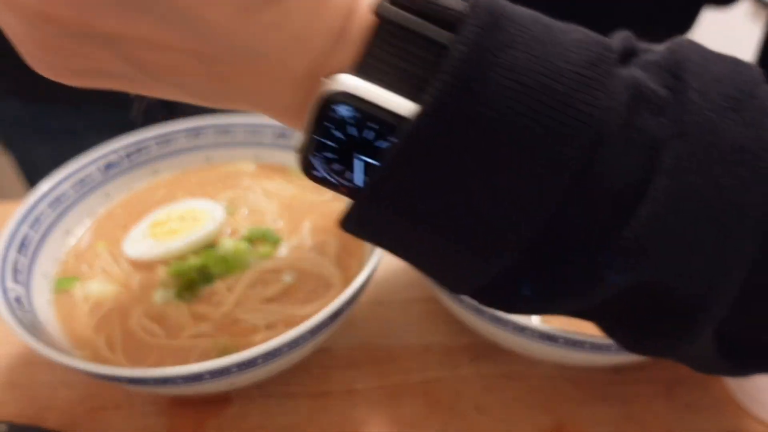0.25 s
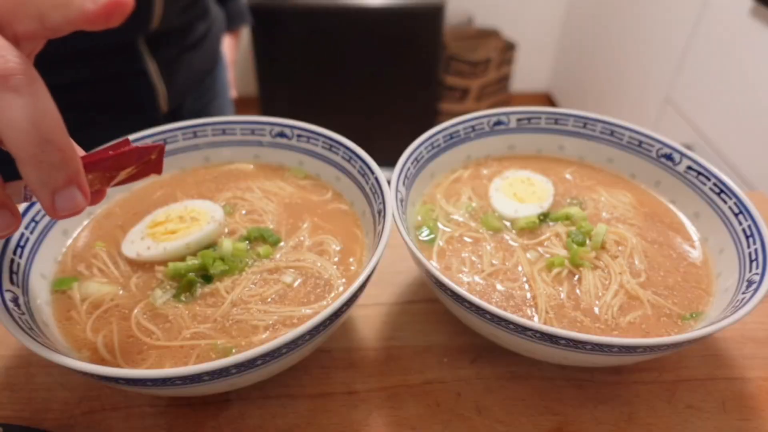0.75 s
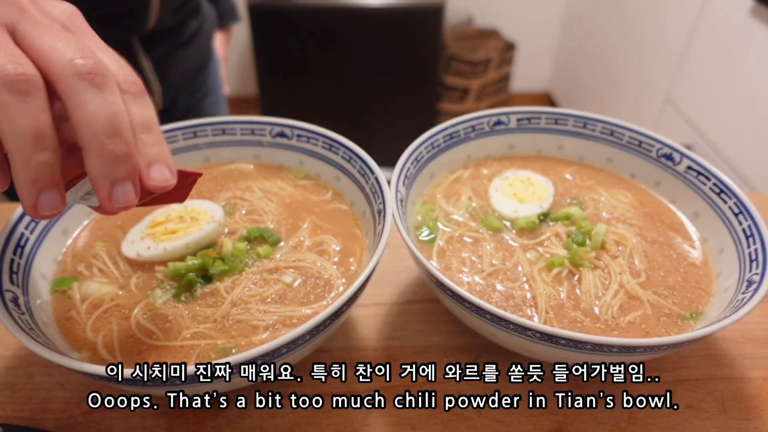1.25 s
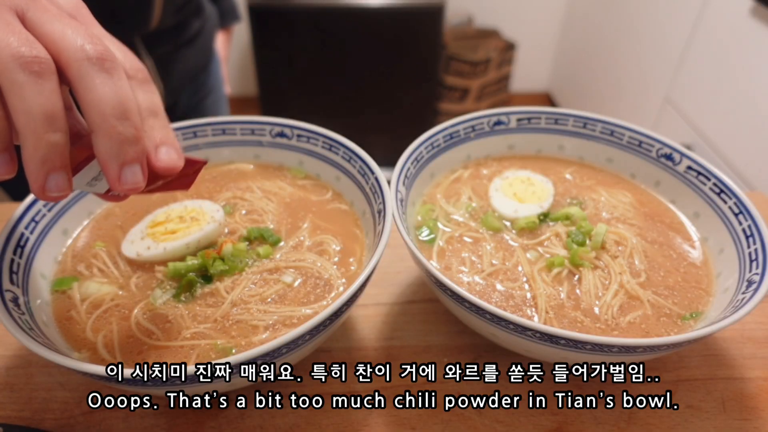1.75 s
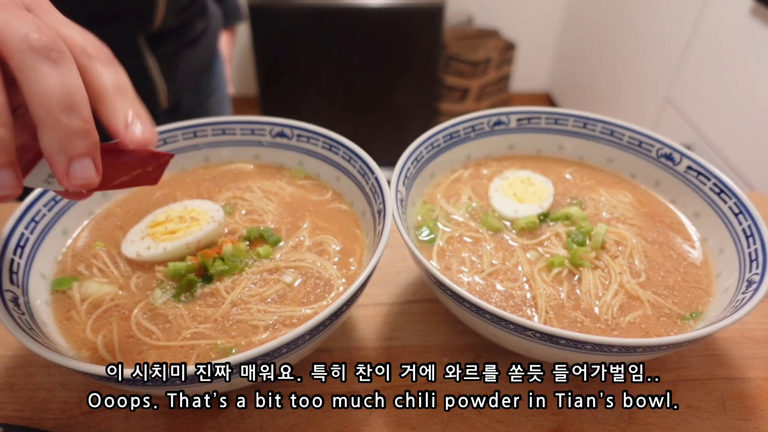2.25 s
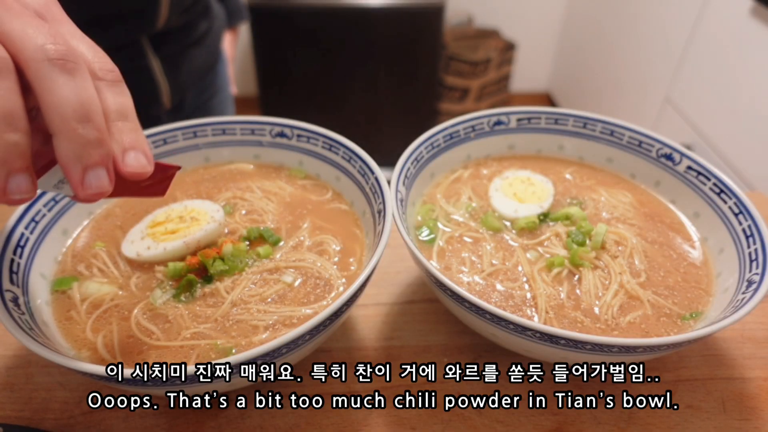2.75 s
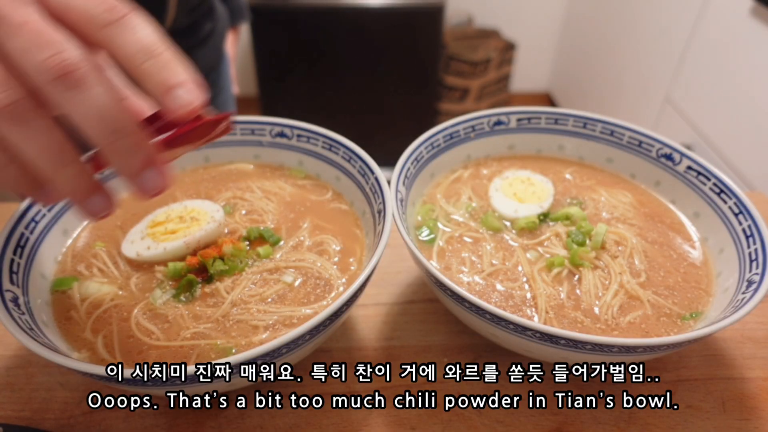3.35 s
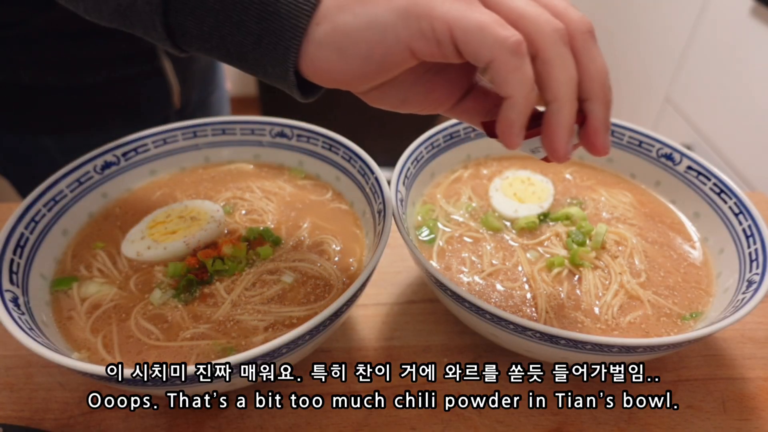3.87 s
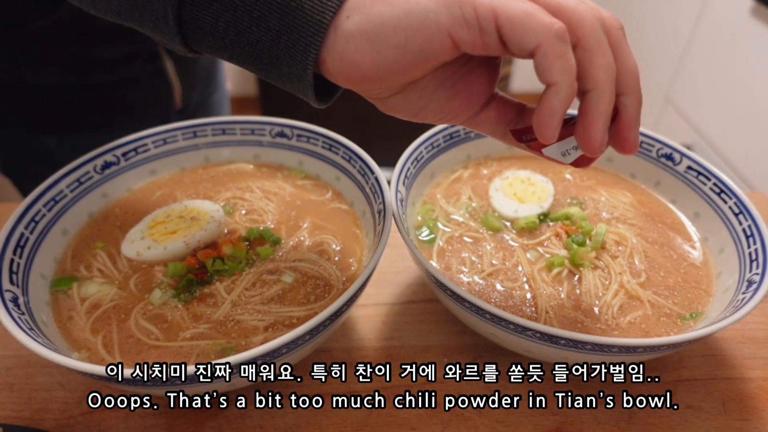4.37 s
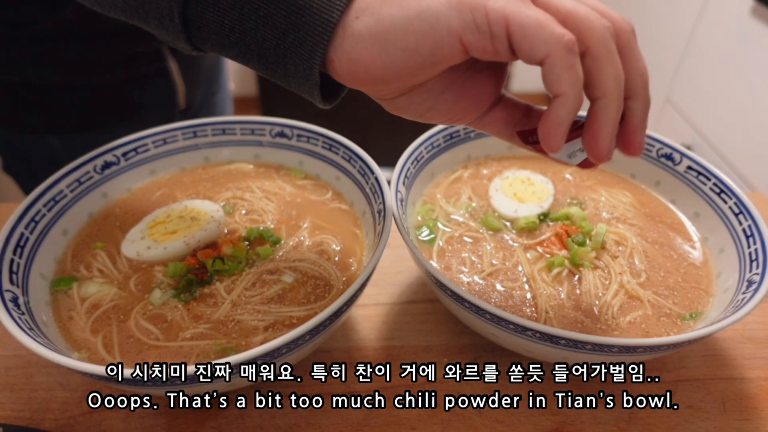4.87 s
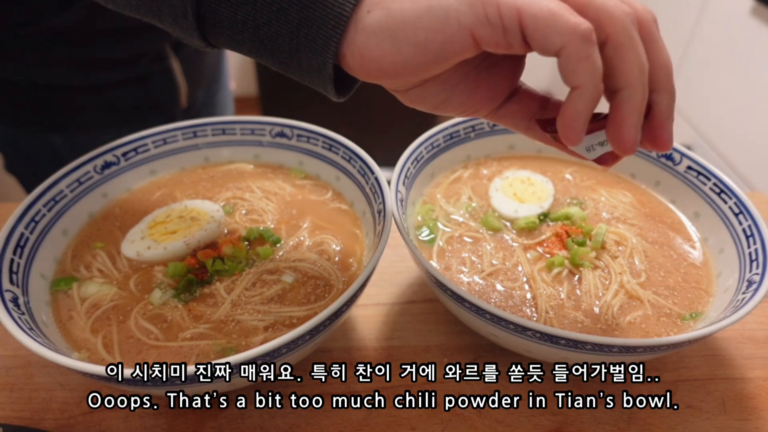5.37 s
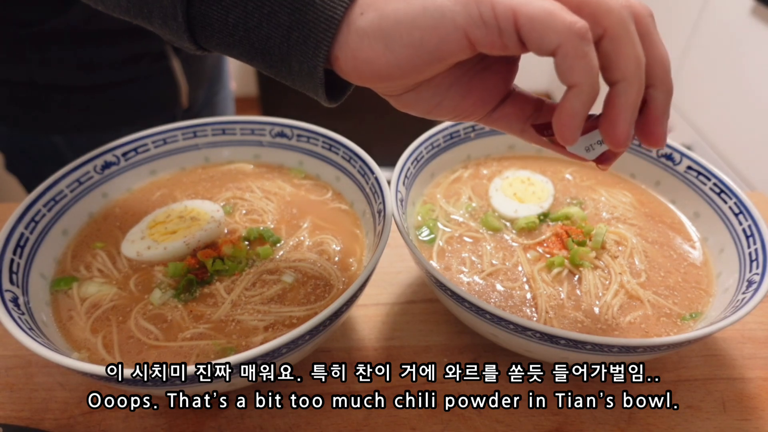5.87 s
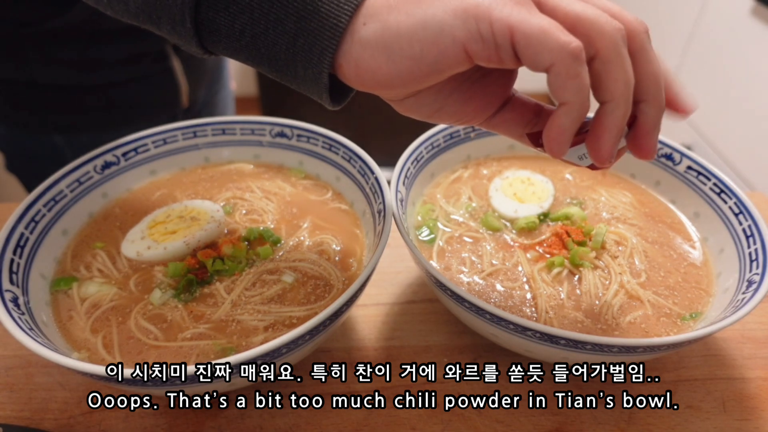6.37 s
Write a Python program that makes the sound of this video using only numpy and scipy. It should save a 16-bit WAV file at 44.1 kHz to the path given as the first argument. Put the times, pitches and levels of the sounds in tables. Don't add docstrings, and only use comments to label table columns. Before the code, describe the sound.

Close microphone in a small hard-walled kitchen with faint hum and hiss. Hands busily crumple a foil sachet for just over half a second, then an abrupt cut to quieter, separated finger taps whose dented foil pops in and out. Dull thuds and a loud bright clatter follow from across the room, then light crinkles, and finally a cluster of clatters with a firm squeeze before another cut.

```python
import sys
import numpy as np
from scipy import signal
from scipy.fft import rfft, irfft
from scipy.io import wavfile

SR = 44100
rng = np.random.default_rng(int(sys.argv[2]) if len(sys.argv) > 2 else 0)


def to_wav(sig):
    pcm = np.clip(np.atleast_2d(sig), -1, 1) * 32767
    pcm = np.round(pcm).astype(np.int16)
    wavfile.write(sys.argv[1], SR, pcm.T)


def natural_amplitude(level_db):
    exponent = np.asarray(level_db, float) / 20
    return 10 ** exponent


N = 291942

CUTS_S = [0, .6256, 6.548, 7]
# f/Hz, level/dB
FIZZ_SPECTRUM = [(2000, -45), (3800, -6.5), (4890, -3.5), (5880, 3), (7400, 0.5), (8700, -4), (9730, -9),
                 (15200, -18), (16100, -23), (16500, -51)]
DENT_HZ = 2400


def unit(x):
    return x / np.sqrt(np.mean(x ** 2) + 1e-20)


def peak_one(x):
    return x / np.abs(x).max()


def coloured(x, spectrum):
    hz, level_db = np.transpose(spectrum)
    grid_hz = np.maximum(np.arange(2049) * SR / 4096, 1)
    log_gain = np.interp(np.log(grid_hz), np.log(hz), level_db) * np.log(10) / 20
    cepstrum = irfft(log_gain)
    cepstrum[1:2048] *= 2
    cepstrum[2049:] = 0
    response = irfft(np.exp(rfft(cepstrum)))
    return signal.fftconvolve(x, response)[:len(x)]


def band(x, low_hz, high_hz):
    return signal.sosfilt(signal.butter(2, [low_hz, high_hz], "band", fs=SR, output="sos"), x)


def resonance(x, hz, width_hz):
    r = np.exp(-np.pi * width_hz / SR)
    zeros = [(1 - r * r) / 2, 0, (r * r - 1) / 2]
    poles = [1, -2 * r * np.cos(2 * np.pi * hz / SR), r * r]
    return signal.lfilter(zeros, poles, x)


def add(track, piece, s):
    at = round(s * SR)
    track[at:at + len(piece)] += piece[:N - at]


def grains(per_s, spread_db, wash):
    clump = unit(band(rng.standard_normal(N), 9.3, 60))
    born = rng.random(N) < per_s * natural_amplitude(5 * clump) / SR
    sizes = natural_amplitude(spread_db * np.minimum(rng.exponential(1, N), 3))
    fade = np.exp(-1 / (0.0007 * SR))
    envelope = signal.lfilter([1], [1, -fade], born * sizes + 1e-18)
    bursts = envelope * rng.standard_normal(N)
    return unit(unit(bursts) + wash * rng.standard_normal(N))


def background():
    # f/Hz, level/dB
    hum_spectrum = [(12, -40), (20, 3), (102, -1.5), (174, 1), (281, -2.5), (452, -24.5), (583, 0),
                    (939, 1.5), (1390, -6.5), (2310, -2.5), (3140, -9.5), (7100, -14.5), (9950, -18.5),
                    (15200, -20.5), (16500, -19)]
    # f/Hz, width/Hz, level/dB
    whine_tones = [(450, 160, -68.5), (2260, 69, -72.5)]
    noise = rng.standard_normal((2, N))
    whines = np.zeros(N)
    for hz, width_hz, level_db in whine_tones:
        tone = resonance(resonance(noise[1], hz, width_hz), hz, width_hz)
        whines += natural_amplitude(level_db) * unit(tone)
    return natural_amplitude(-57) * unit(coloured(noise[0], hum_spectrum)) + whines


def handling():
    # t/s, level/dB
    kneading_effort = [(0, -31), (.06, -35.5), (.09, -46), (.1, -33.5), (.116, -39), (.125, -34), (.2, -37),
                       (.214, -40), (.26, -42), (.29, -39), (.322, -43), (.33, -33.5), (.41, -39),
                       (.47, -36.5), (.515, -44), (.525, -37), (.626, -34.5)]
    # t/s, level/dB
    holding_effort = [(0.63, -58), (1.69, -56.5), (2.32, -50.5), (2.57, -58), (3.23, -58.5), (3.63, -56.5),
                      (3.82, -48), (4.0, -54), (4.23, -56.5), (4.5, -57.5), (4.76, -51.5), (5.29, -57),
                      (5.44, -48.5), (5.45, -84), (6.02, -41), (6.15, -28), (6.25, -34.5), (6.472, -65),
                      (6.62, -58.5)]
    # f/Hz, level/dB
    rub_spectrum = [(30, -25), (100, -26), (200, -10.5), (300, 1.5), (450, 1), (800, -4.5), (1300, -7.5),
                    (1900, -12.5)]
    # f/Hz, level/dB
    crackle_spectrum = [(470, -21), (800, 0.5), (1420, 4), (1750, 4.5), (2010, 3), (3050, 1), (4320, -3.5),
                        (5500, -9), (7150, -84), (12100, -120)]
    t = np.arange(N) / SR
    knead_db = np.interp(t, *np.transpose(kneading_effort))
    hold_db = np.interp(t, *np.transpose(holding_effort))
    kneading = t < CUTS_S[1]
    crackle_db = np.where(kneading, knead_db, hold_db)
    rub_db = np.where(kneading, knead_db - 1, -38 + 0.42 * hold_db)
    fizz_db = crackle_db + np.where(kneading, 0, -4)

    creases = grains(500, spread_db=1.5, wash=1.0)
    skin = grains(450, spread_db=1.0, wash=0.56)
    rub = unit(band(coloured(skin, rub_spectrum), 58, 2300))
    crackle = unit(coloured(creases, crackle_spectrum))
    finest = creases + 0.096 * grains(1000, spread_db=1, wash=0.82)
    fizz = unit(coloured(finest, FIZZ_SPECTRUM))
    sleeve = natural_amplitude(-16.5) * unit(band(rng.standard_normal(N), 35, 174))
    sheet = natural_amplitude(-5.5) * unit(resonance(creases, hz=2030, width_hz=37))
    out = kneading * natural_amplitude(knead_db) * (sleeve + sheet)
    out += natural_amplitude(rub_db - 1.5) * rub
    out += natural_amplitude(crackle_db - 1.5) * crackle
    out -= natural_amplitude(fizz_db - 1.5) * fizz
    return out


def bumps():
    # t/s, peak level/dB, f/Hz
    contacts = [(0.001, -24, 404), (0.031, -26, 450), (0.328, -25, 504), (0.346, -21, 400),
                (0.531, -22, 497), (3.558, -39, 199), (3.672, -28, 125), (3.677, -20.5, 220),
                (5.467, -28, 241), (5.513, -30, 300), (6.2807, -17.5, 276), (6.294, -23, 300)]
    cycles = 2.24
    out, t = np.zeros(N), np.arange(4000) / SR
    for s, peak_db, hz in contacts:
        swing = natural_amplitude(peak_db - 20 * t * hz / cycles) * np.sin(2 * np.pi * hz * t)
        add(out, band(swing, 0.7 * hz, 9000), s)
    return out


def snap_rows():
    # t/s, peak level/dB, own ring f/Hz, bright level/dB
    crumple = [(0.013, -17, 2100, -3), (0.0245, -17, 2030, 18), (0.033, -18, 8900, -14),
               (0.0407, -16, 3650, 9), (0.0507, -8, 2060, -3), (0.0963, -13, 2260, 9),
               (0.1232, -16, 7300, 8), (0.1995, -13.5, 2010, 4), (0.2222, -22, 1420, 2),
               (0.2682, -14, 2930, 15), (0.2892, -13, 3000, 7), (0.3283, -12.5, 1470, 5),
               (0.3354, -10.5, 3590, 2), (0.1085, -18, 7300, 6), (0.179, -23, 4300, 0),
               (0.36, -17, 2000, 4), (0.3919, -14, 7440, 12), (0.473, -13, 7300, -7),
               (0.4133, -18, 5800, 9), (0.4231, -8.5, 2030, 25), (0.4627, -7.5, 2060, 10),
               (0.5212, -4, 2000, 0), (0.5596, -14, 2240, 12), (0.5683, -12, 7550, 0),
               (0.5976, -14.5, 2160, 18)]
    # t/s, peak level/dB, own ring f/Hz, bright level/dB
    crinkle = [(0.0015, -21, 1180, 8), (0.0615, -16, 1690, 7), (0.1005, -16, 2290, 5),
               (0.128, -16, 6500, 1), (0.1345, -17, 2100, 9), (0.1765, -26, 1410, 0),
               (0.1968, -16, 7150, 8), (0.2075, -31, 6500, 5), (0.2385, -30, 1500, 0),
               (0.2535, -22, 1600, 5), (0.2805, -31, 7500, 7), (0.299, -24, 2400, -2),
               (0.311, -31, 2000, -8), (0.3495, -13.5, 2590, 13), (0.399, -17, 7200, 6),
               (0.451, -21, 5800, 6), (0.5372, -15, 2140, -4), (0.5775, -22, 4500, 6), (0.62, -22, 7050, 5),
               (0.9295, -24, 2300, -6), (0.9525, -30, 1800, 5), (0.9785, -28, 5500, 7),
               (1.0165, -34.5, 1290, -5), (1.6175, -27, 1770, -14), (2.874, -41, 1760, -7),
               (2.8995, -25, 2100, -12), (2.911, -31, 2200, -4), (3.2815, -36, 1800, -12),
               (3.308, -33, 2500, -5), (3.387, -33, 1850, -12), (3.411, -45, 1750, -6),
               (3.5755, -41, 990, 0), (4.7665, -42, 3500, 0)]
    # t/s, peak level/dB, own ring f/Hz, bright level/dB
    further_creases = [(0.1255, -19, 2500, 0), (0.3292, -19, 1900, -3), (0.4665, -15, 2100, -5),
                       (0.534, -15, 1500, 2), (0.933, -27, 7500, 8), (1.343, -34, 1200, -10),
                       (1.3515, -32, 3200, 5), (1.781, -38, 2400, 3), (1.812, -35, 3300, 5),
                       (2.426, -36, 1700, -8), (2.8415, -36, 8500, 8), (3.6735, -12, 5200, 0),
                       (3.679, -8, 6000, -3), (3.8432, -16.5, 3000, 5), (5.065, -39.5, 3500, 3),
                       (5.194, -38, 2500, 5), (5.408, -28, 2000, 0), (5.838, -30, 3000, 5),
                       (6.088, -24, 3800, -5), (6.1155, -12, 3000, 3), (6.287, -13, 2880, -2),
                       (5.5305, -19, 4030, -8), (3.8515, -21, 6900, 8), (6.032, -20, 5700, 3),
                       (6.16, -20, 2200, -5), (4.5455, -29, 3000, 3), (4.7025, -30, 3200, 3),
                       (4.455, -38, 3200, 4), (4.611, -26, 5500, 4)]
    # t/s, peak level/dB, own ring f/Hz, bright level/dB
    buckle = [(0.1476, -14.5, 2240, 12), (0.3451, -14, 2630, 24), (0.3763, -11, 1950, 6),
              (0.4399, -13, 2000, 10), (0.5317, -12, 2030, 6), (0.6127, -17, 7100, 5),
              (2.889, -22.5, 1210, -7), (3.316, -34, 2030, -14), (3.3979, -27, 1750, -16),
              (3.6713, -6, 5050, -12), (3.6771, -1.5, 3780, -7), (3.8224, -27, 1900, -21),
              (5.5204, -21, 2530, -5), (6.1082, -12.5, 1380, -4), (6.2645, -22, 2300, -3),
              (6.2815, -9, 2750, 2)]
    # t/s, peak level/dB, own ring f/Hz, bright level/dB
    pinch = [(0.6924, -33, 2840, 29), (0.9214, -9, 6800, 3), (1.4728, -34, 2130, 15),
             (1.762, -28, 2300, -15), (1.8936, -32.5, 7200, -3), (2.9206, -24, 2070, 16),
             (3.05, -34, 7100, 3), (3.089, -31.5, 8300, -5), (3.2669, -21, 2490, -11),
             (3.356, -27, 2410, -3), (3.3764, -22.5, 1870, -16), (3.6575, -32, 2560, -7),
             (3.831, -27, 4000, -16), (3.84, -20, 7000, 5), (3.8468, -15, 2250, -4),
             (3.851, -5.5, 2260, -9.5)]
    # t/s, peak level/dB, own ring f/Hz, bright level/dB
    hidden = [(0.9143, -16.5, 2300, 2), (0.965, -20, 3560, 11), (1.0065, -29.5, 4480, -2),
              (1.995, -36, 7350, -4), (2.1275, -45, 7550, 3), (2.19, -36, 6950, -8),
              (2.5279, -25.5, 6960, -4), (3.528, -35, 5900, -4), (3.56, -37, 3000, 2),
              (3.869, -38, 6840, -7), (3.8795, -21, 6940, -11), (3.932, -27.5, 2540, -3),
              (3.9545, -29, 6470, -10), (4.3965, -25.5, 2320, 1), (4.455, -39, 2520, -3),
              (4.5375, -24, 2980, 5), (4.9136, -35.5, 3320, 11), (4.9874, -31, 2940, 2),
              (5.047, -33.5, 5550, -16), (5.128, -37, 2730, -1), (5.2321, -35, 4160, -20),
              (5.2384, -23, 3770, -31), (5.3835, -29.5, 2690, -4), (5.7054, -25.5, 5450, 12),
              (5.899, -22.5, 3060, -2), (6.025, -17, 5860, 16)]
    # t/s, peak level/dB
    scuffs = [(1.2787, -26), (1.6036, -23.5), (1.749, -29), (2.371, -25.5), (2.7582, -28.5)]
    # t/s, peak level/dB
    pops = [
        (1.2883, -13),
        (1.3362, -9.5),
        (1.6094, -14),
        (1.6468, -10),
        (1.7538, -12.5),
        (1.802, -10.5),
        (2.3768, -15),
        (2.433, -10.5),
        (2.7663, -15.5),
        (2.795, -16),
    ]
    # t/s, peak level/dB, own ring f/Hz, bright level/dB
    squeeze = [(4.55, -21, 3400, 3), (4.6033, -19, 3400, 2), (4.6078, -20, 5270, 0), (4.698, -31, 1500, 3),
               (4.7075, -21, 3500, 1), (4.7434, -21.5, 3050, -1), (4.7487, -24.5, 3000, 9),
               (4.8396, -25, 2490, 1), (4.901, -33.5, 2260, 10), (5.4002, -27.5, 2820, -1),
               (5.4423, -22, 2960, 26), (5.7613, -25, 970, 9), (5.8054, -22, 5740, 8),
               (5.9454, -22.5, 4440, -22), (6.5308, -24.5, 5170, -13)]
    # t/s, peak level/dB, own ring f/Hz, bright level/dB
    wring = [(5.53, -22.5, 2400, -8), (5.7711, -22.5, 5900, 0), (5.815, -18, 1790, -5),
             (5.821, -17, 3180, 8), (5.908, -26, 2500, -15), (5.9537, -30, 1980, 1), (5.971, -23, 6500, 7),
             (6.1128, -17, 6330, 13), (6.1465, -13, 4570, -6), (6.2036, -15, 7800, 8),
             (6.23, -31, 2200, 13), (6.353, -23, 4500, -4), (6.4381, -32.5, 2810, -10),
             (6.5355, -26, 3170, 0), (6.537, -21.5, 6600, 8), (6.542, -22.5, 3000, 3)]
    # air push level/dB, room share level/dB,
    # push lost per dB of peak [dB/dB], room share lost per dB of peak [dB/dB]
    crumple_mix = (-22, -3.5, -2, 0.9)
    buckle_mix = (0.5, -18, 0.5, 0.37)
    tap_mix = (-75, -8.5, 0, 0.5)
    pinch_mix = (-40, -8.5, 1, 0.04)
    squeeze_mix = (-20, -14, 0.86, 0.9)
    hidden_mix = (-13.5, -3.5, -0.14, 0.39)
    crinkle_mix = (-25, -11, 0, 0.3771)
    wring_mix = (-35, -4, -3, 0.32)

    reference_db = -15
    taps = [(s, db, DENT_HZ, -8) for s, db in pops]
    touches = [(s, db, 3400, 3) for s, db in scuffs]
    kinds = [(crumple, crumple_mix, 1), (buckle, buckle_mix, 1), (taps, tap_mix, 0.25),
             (touches, tap_mix, 1.7), (pinch, pinch_mix, 1), (squeeze, squeeze_mix, 1),
             (hidden, hidden_mix, 1), (crinkle, crinkle_mix, 1), (wring, wring_mix, 1),
             (further_creases, crinkle_mix, 1)]
    rows = []
    for table, (push_db, room_db, push_loss, room_loss), looseness in kinds:
        for s, peak_db, hz, bright_db in table:
            over_db = peak_db - reference_db
            push, room = push_db - push_loss * over_db, room_db - room_loss * over_db
            rows.append((s, peak_db, hz, bright_db, push, room, looseness))
    return rows


def snaps():
    # f/Hz, level/dB
    body_spectrum = [(700, -70.5), (1300, -1), (1800, -12.5), (2200, 2), (2700, -1.5), (3250, 1.5),
                     (3800, -2), (4600, -15), (6500, -41)]
    # f/Hz, level/dB
    tick_spectrum = [(2500, -32.5), (4300, -1), (5300, 5), (6200, 0), (7400, 3), (8600, -5.5), (9500, -16),
                     (12000, -14), (16500, -33)]
    # f/Hz, level/dB
    dent_spectrum = [(900, -27.5), (1300, -19), (1850, -16.5), (2150, 0.5), (2600, -1), (3300, 2.5),
                     (3900, -5), (4550, -15.5), (5600, -7.5), (6700, -14.5), (7900, -9.5), (9500, -22.5),
                     (16500, -41)]
    splinter_share, splinter_s = 0.16, 0.0021
    echo_s, echo_gain = 0.001048, 0.22
    near, sent = np.zeros(N), np.zeros(N)
    t = np.arange(900) / SR
    click = 1. * (t == 0)
    body = peak_one(coloured(click, body_spectrum))
    tick = peak_one(coloured(click, tick_spectrum))
    dent = peak_one(coloured(click, dent_spectrum))
    push = np.sin(2 * np.pi * 560 * t) * np.exp(-t / 0.00092)
    for s, peak_db, hz, bright_db, push_db, room_db, looseness in snap_rows():
        fold = min(looseness, 1) * peak_one(resonance(resonance(click, hz, 0.17 * hz), hz, 1.73 * hz))
        tight_db = 8 * (hz > 3600)
        ring = 0.48 * fold
        ring += natural_amplitude(-max(bright_db, 0) - tight_db - 5.0) * body
        ring += natural_amplitude(min(bright_db, 0) - 1.5) * tick
        if hz == DENT_HZ:
            ring = dent
        noise = rng.standard_normal(len(t))
        splinters = splinter_share * looseness * noise * np.exp(-t / splinter_s)
        splinters[round(echo_s * SR)] -= echo_gain
        snap = np.convolve(click + splinters, ring)[:len(t)]
        low = natural_amplitude(peak_db + push_db - 11.0) * push
        add(near, natural_amplitude(peak_db) * peak_one(snap) + low, s)

        top_db = np.clip(bright_db, -14, 8)
        spread = [(800, -25.5), (1900, 2.0), (3200, 1.5), (4700, 0.17 * top_db + 0.5),
                  (7500, top_db), (9500, top_db - 8.5), (16000, top_db - 35)]
        radiated = peak_one(coloured(click, spread)) + 0.26 * fold
        add(sent, natural_amplitude(room_db + 2.0) * (natural_amplitude(peak_db) * radiated + low), s)
    return near, sent


def kitchen(x):
    # f/Hz, t60/s
    room_t60 = [(150, 0.35), (1000, 0.24), (4000, 0.22), (12000, 0.18)]
    # t/s, level/dB
    echoes = [
        (.0075, 8),
        (.016, 2),
        (0.028, 5),
    ]
    t = np.arange(SR // 2) / SR
    edges = np.geomspace(120, 15000, num=9)
    hz, t60 = np.transpose(room_t60)
    noise = rng.standard_normal(len(t))
    tail = np.zeros(len(t))
    for low, high in zip(edges, edges[1:]):
        band_t60 = np.interp(np.log(low * high) / 2, np.log(hz), t60)
        tail += band(noise, low, high) * natural_amplitude(-60 * t / band_t60)
    tail *= np.clip((t - 0.002) / 0.0056, 0, 1)
    tail /= np.sqrt(np.sum(tail ** 2))
    for lag, db in echoes:
        tail[round(lag * SR)] += natural_amplitude(db - 24.0)
    out = np.zeros(N)
    for start, end in zip(CUTS_S, CUTS_S[1:]):
        take = slice(round(start * SR), round(end * SR))
        out[take] = signal.fftconvolve(x[take], tail)[:len(x[take])]
    return out


def grainy_tones(rows, width):
    out, rough = np.zeros(N), grains(900, spread_db=6.5, wash=1.0)
    for s, length, level_db, hz in rows:
        width_hz = width * hz
        part = np.linspace(0, 1, round(length * SR))
        source = rough[round(s * SR):][:len(part)]
        tone = unit(resonance(resonance(source, hz, width_hz), hz, 2 * width_hz))
        add(out, natural_amplitude(level_db) * np.sin(np.pi * part ** 0.4) ** 2 * tone, s)
    return out


def swells():
    # t/s, length/s, level/dB, centre f/Hz
    slides = [(0.037, 0.087, -39, 450), (0.131, 0.074, -35.5, 367), (0.337, 0.042, -31.5, 630),
              (0.587, 0.02, -32.5, 1220), (0.91, 0.12, -45, 1400), (1.037, 0.14, -48, 1390),
              (5.757, 0.048, -34, 770), (1.027, 0.22, -49.5, 3470), (2.024, 0.2, -46.5, 1520),
              (2.028, 0.19, -46, 3100), (2.872, 0.071, -36.5, 1330), (3.263, 0.06, -41, 760),
              (3.561, 0.022, -50, 298), (3.667, 0.031, -33, 235), (3.66, 0.09, -48, 94),
              (3.673, 0.027, -30, 716), (5.466, 0.02, -33, 257), (6.031, 0.069, -39, 152),
              (4.532, 0.039, -47, 1500), (5.47, 0.09, -37.5, 229), (5.541, 0.15, -34.5, 2770),
              (5.545, 0.17, -47.5, 63), (5.818, 0.01, -26.5, 2660), (5.904, 0.18, -52, 63.3),
              (6.17, 0.081, -36.5, 2000), (6.283, 0.062, -30.5, 260), (6.425, 0.033, -45.5, 800),
              (3.569, 0.037, -49.5, 298), (0.104, 0.011, -31, 500), (0.145, 0.012, -32, 504)]
    return grainy_tones(slides, width=0.8)


def squeaks():
    # t/s, length/s, level/dB, centre f/Hz
    ringing = [(0.6, 0.024, -44, 4400), (1.988, 0.07, -48, 863), (2.866, 0.07, -45.5, 381),
               (3.372, 0.064, -40.5, 1820), (3.68, 0.12, -34, 6240), (3.676, 0.0079, -18.5, 5500),
               (6.295, 0.072, -31.5, 1080), (3.682, 0.13, -36, 3830), (6.283, 0.09, -29.5, 5760),
               (5.825, 0.087, -44, 6000), (5.802, 0.025, -26.5, 5780), (5.55, 0.036, -29, 2440),
               (3.487, 0.044, -54, 4300), (5.579, 0.047, -32, 843), (5.762, 0.038, -32.5, 5900),
               (6.015, 0.08, -29, 5800), (6.105, 0.045, -25, 3100), (6.105, 0.042, -27.5, 1390),
               (6.109, 0.028, -22.5, 6080)]
    return grainy_tones(ringing, width=0.09)


def far_blows(rows, treble_db):
    out, t = np.zeros(N), np.arange(22000) / SR
    for s, level_db, hz, low_db, t60 in rows:
        noise = rng.standard_normal((3, len(t)))
        lumps = [natural_amplitude(0.78 * unit(flutter)) for flutter in band(noise[::-1], 39, 63)]
        fade = natural_amplitude(-60 * t / max(t60, 0.03)) * (1 - np.exp(-t / 0.00078))
        middle = unit(band(noise[0], 740, 4120))
        ring = unit(resonance(noise[1], hz, 0.067 * hz)) * (0.68 + 0.33 * np.exp(-t / 0.024))
        low = natural_amplitude(low_db + 20) * unit(band(band(noise[1], 115, 1030), 84, 1120))
        bright = natural_amplitude(treble_db) * unit(coloured(noise[2], FIZZ_SPECTRUM))
        blow = lumps[0] * middle + lumps[1] * (ring + low) + lumps[2] * bright
        add(out, natural_amplitude(level_db - 14.5) * fade * blow, s)
    return out


def thuds():
    # t/s, level/dB, ring f/Hz, low level/dB, t60/s
    dull_blows = [(2.86, -26, 1950, -35, 0.52), (3.265, -27, 2320, -47, 0.55),
                  (3.353, -26.5, 1980, -26, 0.39), (5.235, -27, 3650, -64, 0.32),
                  (5.468, -30, 810, -8.5, 0.52), (5.895, -26, 790, -18, 0.24),
                  (6.418, -30.5, 726, -17, 0.39)]
    return far_blows(dull_blows, treble_db=-39)


def clatters():
    # t/s, level/dB, ring f/Hz, low level/dB, t60/s
    bright_blows = [(3.68, -10.5, 4140, -27, 0.23), (3.847, -24.5, 2500, -24, 0.067),
                    (5.523, -16, 2390, -28, 0.42), (5.705, -30.5, 5660, -25.5, 0.9),
                    (5.763, -22.5, 713, -20, 0.46), (5.805, -18.5, 5850, -28, 0.17),
                    (5.948, -22.5, 2240, -32, 0.44), (6.021, -16.5, 5800, -28.5, 0.95),
                    (6.109, -9.5, 2310, -41, 0.3), (6.2807, -11, 2840, -27, 0.31),
                    (6.532, -19.5, 2200, -35, 0.074)]
    return far_blows(bright_blows, treble_db=-4)


def scene():
    near, sent = snaps()
    near = band(near, 170, 19000)
    hands = handling() + swells() + squeaks() + bumps()
    far = thuds() + clatters()
    far[round(CUTS_S[2] * SR):] = 0
    mono = near + far + hands + kitchen(sent + natural_amplitude(-13) * hands) + background()
    trace = natural_amplitude(-32) * band(np.roll(near, shift=2), 1600, 19000)
    trace += natural_amplitude(-65.5) * band(rng.standard_normal(N), 20, 370)
    return np.array([mono + trace, mono - trace])


def roll_off(x):
    return signal.sosfilt(signal.butter(12, 17020, fs=SR, output="sos"), x)


def record(dry):
    rounded = 1.1 * np.tanh(dry / 1.1)
    low_pass = signal.cheby2(12, 60, 16900, fs=SR, output="sos")
    finished = signal.sosfilt(low_pass, rounded)
    return roll_off(finished)


dry = scene()
out = record(dry)
to_wav(out)
```